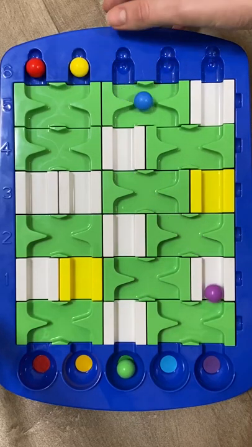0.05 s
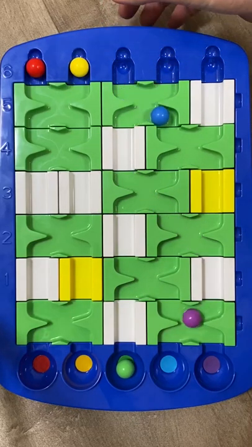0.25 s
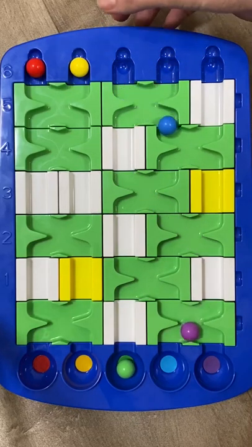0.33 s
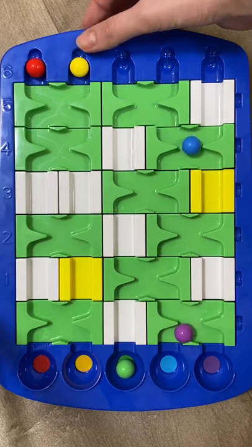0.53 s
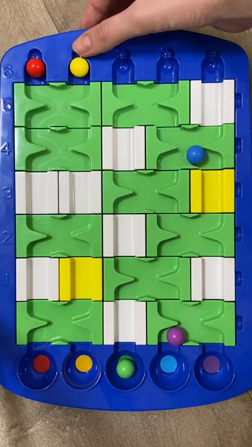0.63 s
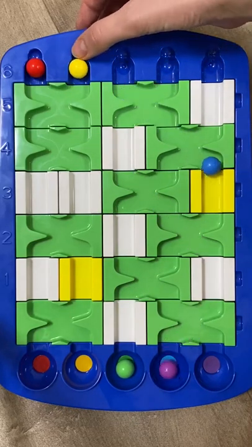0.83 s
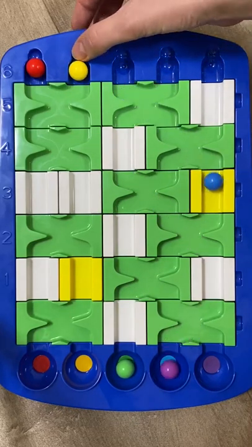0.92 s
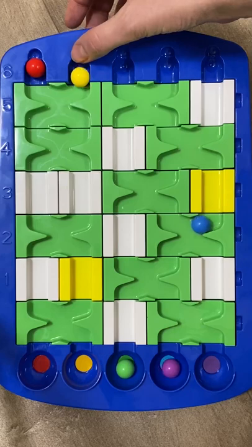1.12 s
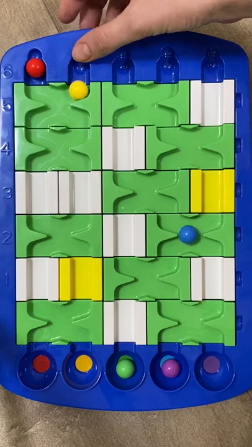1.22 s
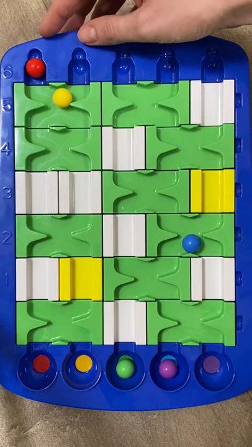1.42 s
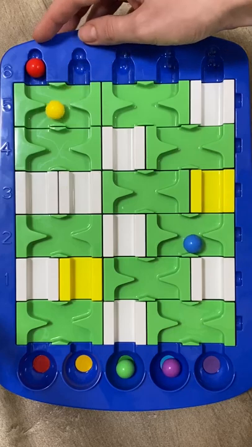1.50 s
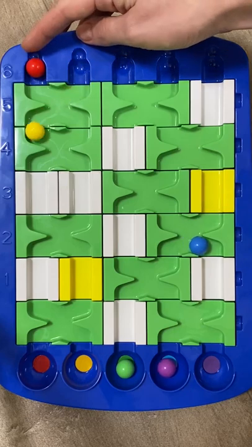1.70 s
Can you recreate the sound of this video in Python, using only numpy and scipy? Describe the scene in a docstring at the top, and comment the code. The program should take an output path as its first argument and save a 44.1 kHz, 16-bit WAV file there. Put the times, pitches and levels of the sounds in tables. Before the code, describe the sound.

Marbles knock irregularly along a plastic board, rolling faintly, and one bounces into a cup.

```python
"""In a fairly live room with a low hum, marbles roll down a tilted plastic board and knock against the
walls of its track tiles; one drops into a cup and rattles to rest. Each impact excites a dense set of
quickly damped modes, coloured by the resonances of tile or cup. Between impacts, tiny bumps under the
marbles drive the tiles faintly. Two closely spaced microphones receive the direct and reflected sound."""
import sys
import numpy as np
from scipy import signal
from scipy.fft import rfft, irfft, next_fast_len
from scipy.io import wavfile
from scipy.ndimage import uniform_filter1d

SR = 44100
rng = np.random.default_rng(int(sys.argv[2]) if len(sys.argv) > 2 else 0)


def int16_out(signal):
    """Quantize to a 16-bit WAV file."""
    q = np.round(np.clip(np.atleast_2d(signal).T, -1, 1) * 32767)
    wavfile.write(sys.argv[1], SR, q.astype(np.int16))


N = 77175
LEAD = SR // 5  # samples ahead of t = 0, so that the room is already sounding
SIZE = next_fast_len(N + LEAD + SR)
FREQS = np.maximum(np.arange(SIZE // 2 + 1) * SR / SIZE, 1)
# resonances of the track tiles: f/Hz, bandwidth/Hz, lift/dB
TILE_MODES = [(370.8, 18.7, 9), (497, 13, 5.5), (1094, 300, 3.5), (1803, 46, 3), (2176, 164, 7),
              (3177, 150, 5.5), (3866, 84, 11), (4310, 44, 4), (4730, 55, 4.5), (5960, 68, 1),
              (8280, 180, 8.5), (10160, 80, 4.5), (11480, 190, 7), (14200, 250, 0)]


def track_knocks():
    """Impact excitation: a marble strikes a track wall and the tile vibrates freely."""
    # knocks: t/s, rise/s, thud, clack, snap and tick level/dB, the wall's note f/Hz, note level/dB
    knocks = [(-0.03, 0.00077, -33.5, -32.5, -33, -34, 430, -39.5),
              (0.0885, 0.0018, -51, -65, -73, -62, 1680.0, -59),
              (0.1192, 0.0014, -40, -36, -37.5, -35, 1052, -44),
              (0.138, 0.0016, -48, -43, -48.5, -50, 1070, -48),
              (0.1542, 0.0021, -34.5, -39, -30, -24, 2046, -41),
              (0.1692, 0.0011, -45.5, -32, -43, -31.5, 1210, -41),
              (0.1775, 0.0014, -59, -51, -59, -49, 1860, -43),
              (0.193, 0.0036, -49, -38.5, -50.0, -44, 471, -37),
              (0.1985, 0.0016, -43, -50, -52.0, -42, 529, -39.5),
              (0.22, 0.0029, -56, -47, -52, -52, 346, -49.5),
              (0.3325, 0.001, -39.5, -32.5, -34.5, -32, 1177, -38.5),
              (0.3795, 0.0025, -74, -55, -61, -58, 2170.0, -55),
              (0.3897, 0.00088, -38, -39, -39, -28, 2120, -48.5),
              (0.441, 0.0017, -41, -34.5, -39.5, -32, 2040, -47.5),
              (0.4765, 0.00081, -48, -44, -49.0, -39, 1250, -52),
              (0.5695, 0.0011, -47.0, -50.5, -67, -68, 720, -45),
              (0.5992, 0.00052, -41, -47, -39.5, -43, 2170, -43),
              (0.606, 0.00046, -52, -36, -76, -60.0, 1116, -45),
              (0.6405, 0.00087, -47, -30, -47, -26.5, 1113, -42.5),
              (0.6485, 0.00036, -55, -48, -52, -62, 398, -43),
              (0.7255, 0.00083, -55, -49, -49.5, -56, 1080.0, -46),
              (0.7645, 0.00074, -48, -37.5, -34, -33.0, 1925, -45.5),
              (0.7825, 0.0013, -46, -44, -45, -68, 1820, -46.5),
              (0.7975, 0.0025, -61, -40.5, -46.5, -54, 1630.0, -46.0),
              (1.0688, 0.0014, -40.5, -34, -42.5, -40, 1160, -38.5),
              (1.086, 0.001, -37.5, -54, -52, -58, 2230, -42),
              (1.1037, 0.0018, -41, -26.5, -34, -23, 2100, -33),
              (1.2085, 0.0012, -75, -76, -54, -60, 2080, -58),
              (1.2542, 0.0019, -44.5, -32, -37, -29.5, 1200, -39.5),
              (1.2582, 0.00082, -38.5, -32.0, -34, -31, 1170, -35.5),
              (1.2655, 0.0026, -46, -42, -47, -57, 1297, -41.5),
              (1.3285, 0.00033, -52, -35.0, -49.5, -26.0, 1076, -36),
              (1.3905, 0.0042, -53, -47, -55.5, -58, 1214, -46),
              (1.4095, 0.00059, -47, -64, -68, -72, 1280, -52.5),
              (1.538, 0.00064, -56, -51.0, -85, -72.0, 1310, -51.5),
              (1.5758, 0.00097, -45, -37.5, -55.5, -29, 1365, -44.5),
              (1.595, 0.003, -51.5, -50, -49, -46.5, 526, -43.5),
              (1.6102, 0.00076, -52, -50, -44.5, -49, 1320, -50.0),
              (1.6885, 0.0013, -59.5, -64, -79, -61, 1290.0, -56.5),
              (1.7232, 0.0017, -43.5, -40, -41.5, -30.5, 1086, -51),
              (1.7375, 0.0012, -45, -41, -63, -55, 1380.0, -61)]
    # spectral envelope of a tile: f/Hz, level/dB
    colour = [(200, -36.5), (330, -7.5), (480, -8.5), (700, -9.5), (900, -7), (1150, -6.5), (2000, -7.5),
              (2800, -9.5), (4600, -8.5), (7000, -3), (8500, -8.5), (10500, -16.5), (15000, -19.5)]
    # decay time of a tile: f/Hz, T60/s
    ring = [(350, 0.07), (1200, 0.074), (3500, 0.072), (8000, 0.026), (15000, 0.014)]
    return impacts(knocks, colour, ring, TILE_MODES)


def cup_bounces():
    """Inelastic rebound: a marble lands in the cup and excites its modes anew at each bounce."""
    # bounces: t/s, rise/s, thud, clack, snap and tick level/dB, the spot's note f/Hz, note level/dB
    bounces = [(0.865, 0.001, -57, -39.5, -57, -77, 870, -55),
               (0.8769, 0.0012, -37.5, -24, -29.5, -33, 830, -32),
               (0.8913, 0.00017, -35.5, -33, -28.5, -33.5, 1890, -28.5),
               (0.9118, 0.0005, -59, -38, -40, -64, 2000, -54),
               (0.9158, 0.00087, -51, -45.0, -47, -55, 1970, -46),
               (0.921, 0.00032, -52, -43, -30, -40, 1990, -41),
               (0.9255, 0.00021, -56, -45.5, -35, -39.5, 704, -46),
               (0.9408, 0.00041, -62, -34, -44, -52, 2240, -38),
               (0.9742, 0.00023, -45, -32.5, -36, -42.5, 1880, -32.5),
               (0.989, 0.00026, -55.5, -35.0, -44.5, -52, 834, -39.5)]
    # spectral envelope of the cup: f/Hz, level/dB
    colour = [(200, -42), (340, -8.5), (480, -4.5), (650, -10), (900, -0.5), (1300, -10), (2000, -4),
              (3500, -3), (5000, -6), (8000, -4.5), (11000, -4.5), (15000, -1)]
    # decay time of the cup: f/Hz, T60/s
    ring = [(350, 0.14), (1200, 0.099), (3500, 0.036), (8000, 0.056), (15000, 0.009)]
    # resonances of the cup: f/Hz, bandwidth/Hz, lift/dB
    modes = [(369.5, 42, 11.2), (539, 72, 8.8), (779, 63, 6.9), (994, 73, 5.8), (1505, 36, 10.7),
             (1874, 69, 6.2), (3130, 20, 4.5), (3430, 40, 8.6), (3620, 42, 7), (5840, 73, 2.3),
             (12600, 210, 4.3), (14400, 290, 5.2)]
    return impacts(bounces, colour, ring, modes)


def impacts(rows, colour, ring, modes):
    """Damped free vibration: each blow gives a crack, a ring of dense modes and the struck spot's note."""
    # centres of thud, clack, snap and tick: f/Hz
    registers = [450, 1400, 4200, 7500]
    crack_db, crack_s, crack_cycles = 3, .0007, 1.2  # height over the ring; time constant in two parts
    note_t60_cycles = 18.6
    rows = np.array(rows)
    start_s, rise_s, register_db = rows[:, 0], rows[:, 1:2], rows[:, 2:6]
    note_hz, note_db = rows[:, 6:7], rows[:, 7:8]
    t = np.arange(int(.1 * SR)) / SR
    attack = 1 - np.exp(-(t / np.maximum(rise_s, 1 / SR)) ** 2)
    note = np.sin(2 * np.pi * note_hz * t) * from_db(-60 * t * note_hz / note_t60_cycles)
    sounds = equal_energy(attack * note) * from_db(note_db)
    for hz, noise in noise_bands((len(rows), len(t))):
        crack = from_db(crack_db) * np.exp(-np.maximum(t - rise_s, 0) / (crack_s + crack_cycles / hz))
        decay = from_db(-60 * t / at_hz(ring, hz))
        burst = equal_energy(noise * attack * (crack + decay))
        band_db = np.array([np.interp(np.log(hz), np.log(registers), db) for db in register_db])
        sounds = sounds + burst * from_db(band_db + at_hz(colour, hz))[:, None]
    train = np.zeros(SIZE)
    for s, sound in zip(start_s, sounds):
        start = LEAD + int(s * SR)
        train[start:start + len(t)] += sound
    return resonate(train[:LEAD + N], modes)


def rolling():
    """Roughness excitation: tiny bumps under the marbles drive the tiles with random impulses."""
    # strength of the rolling: t/s, level/dB
    strength = [(0, -67), (.1, -51.5), (.2, -54.5), (.3, -58), (.45, -61), (.55, -59.5), (.7, -63),
                (.84, -51.5), (.93, -41.5), (1.02, -47), (1.15, -51.5), (1.3, -53), (1.48, -62.5),
                (1.62, -59.5), (1.75, -61)]
    # spectral envelope of a bump: f/Hz, level/dB
    colour = [(100, -55), (220, 2), (370, -0.5), (700, 8.5), (1200, -0.5), (2200, -1), (3200, -10.5),
              (6000, -49), (10000, -21.5), (16000, -36)]
    bumps_per_s, spread_db = 760, 0.5
    n = LEAD + N
    sizes = from_db(spread_db * np.minimum(rng.exponential(1, n), 4)) * rng.choice([-1, 1], n)
    bumps = sizes * (rng.random(n) < bumps_per_s / SR)
    patter = resonate(filtered(bumps, from_db(at_hz(colour, FREQS))), TILE_MODES)
    t = (np.arange(n) - LEAD) / SR
    return rms_one(patter) * from_db(np.interp(t, *np.transpose(strength)))


def reflections(x):
    """Scattering and reverberation: quick echoes off the board, and a tail that dies sooner in the treble."""
    # gain of the diffuse field: f/Hz, level/dB
    room_level = [(150, -4), (400, -10.5), (1000, -12.5), (2200, -8.5), (4500, -10), (8500, -14.5),
                  (15000, -13)]
    # reverberation time: f/Hz, T60/s
    room_t60 = [(200, 1), (1000, 0.46), (2500, 0.44), (5000, 0.44), (9000, 0.3), (15000, 0.19)]
    # share of the board's scattering that differs between the microphones: f/Hz, level/dB
    scatter_level = [(200, -32), (600, -7), (1300, -17.5), (3000, -19), (8000, -33), (15000, -5)]
    delay_s, build_s, width = 0.0043, 0.0029, 0.3
    scatter_delay_s, scatter_t60_s = 0.0016, 0.017
    t = np.arange(SR) / SR
    build = 1 - np.exp(-np.maximum(t - delay_s, 0) / build_s)
    tail = sum(noise * build * from_db(-60 * t / at_hz(room_t60, hz))
               for hz, noise in noise_bands((2, SR)))
    mid, side = filtered(x, whitened_spectrum(tail) * from_db(at_hz(room_level, FREQS)))
    scatter = rng.standard_normal(SR) * from_db(-60 * t / scatter_t60_s) * (t > scatter_delay_s)
    scatter /= np.sqrt(np.sum(scatter ** 2))
    scattered = filtered(x, rfft(scatter, SIZE) * from_db(at_hz(scatter_level, FREQS)))
    return mid + (width * side + scattered) * np.array([[1], [-1]])


def background():
    """Stationary noise floor: soft low room noise and a sinusoidal mains hum."""
    # spectral density of the room noise: f/Hz, relative level/dB
    colour = [(20, -31), (30, -26), (40, -22), (58, 4.5), (80, -5), (140, 4.5), (220, -11), (500, -9),
              (1500, -28), (5000, -49), (16000, -36)]
    floor_db, width = -60.5, 0.13
    hum_hz, hum_db = 100.6, -60
    mid, side = rms_one(filtered(rng.standard_normal((2, N)), from_db(at_hz(colour, FREQS))))
    hum = np.sqrt(2) * np.sin(2 * np.pi * hum_hz * np.arange(N) / SR)
    return from_db(floor_db) * (mid + width * side * np.array([[1], [-1]])) + from_db(hum_db) * hum


def resonate(x, modes):
    """Resonance: each mode lifts its own narrow band and rings on."""
    for hz, width_hz, lift_db in modes:
        b, a = signal.iirpeak(hz, hz / width_hz, fs=SR)
        x = x + (from_db(lift_db) - 1) * signal.lfilter(b, a, x)
    return x


def noise_bands(shape):
    """Third-octave bands of noise, each with its centre frequency; neighbours are uncorrelated."""
    edges_hz = 180 * 2 ** (np.arange(21) / 3.04)
    run_in = SR // 20
    white = rng.standard_normal((shape[0], 2, shape[1] + run_in))
    for k, (low, high) in enumerate(zip(edges_hz, edges_hz[1:])):
        sos = signal.butter(2, [low, high], "band", fs=SR, output="sos")
        yield np.sqrt(low * high), signal.sosfilt(sos, white[:, k % 2])[:, run_in:]


def whitened_spectrum(x, width_hz=40):
    """Whitening: division by the smoothed magnitude leaves only the fine structure of a spectrum."""
    spectrum = rfft(x, SIZE)
    power = uniform_filter1d(np.abs(spectrum) ** 2, size=int(width_hz * SIZE / SR))
    return spectrum / np.sqrt(power + 1e-4 * power.mean(axis=-1, keepdims=True))


def equal_energy(bursts, window_s=.007):
    """Energy normalisation: each burst carries as much as rms 1 held for window_s."""
    return bursts / np.sqrt(np.sum(bursts ** 2, axis=1, keepdims=True) / (window_s * SR) + 1e-20)


def rms_one(x):
    """Power normalisation to rms 1."""
    return x / np.sqrt(np.mean(x ** 2) + 1e-20)


def from_db(db):
    """Amplitude ratio of a level in decibels."""
    return 10 ** (np.asarray(db) / 20)


def at_hz(points, hz):
    """Interpolation of a table on a log-frequency axis."""
    f, value = np.transpose(points)
    return np.interp(np.log(hz), np.log(f), value)


def filtered(x, response):
    """Convolution, as the product of spectrum and frequency response."""
    return irfft(rfft(x, SIZE) * response, SIZE)[..., :x.shape[-1]]


def scene():
    """Superposition of knocks, bounces and rolling, their reflections and the noise floor."""
    direct = track_knocks() + cup_bounces() + rolling()
    return (direct + reflections(direct))[:, LEAD:] + background()


def record(dry):
    """Spaced-pair stereophony: the microphones differ in phase and level; a low-pass cuts the top."""
    # lead of left over right: f/Hz, phase/rad
    phase = [(30, 0), (800, .08), (1750, -.08), (2500, .6), (3300, .25), (4400, .8), (5000, .35),
             (6000, 1.4), (7350, 3.14), (9470, 5.6), (10900, 6.5), (13400, 9.4), (15800, 11.6)]
    # left minus right: f/Hz, level/dB
    balance = [(60, 0.5), (180, -2.2), (380, -2), (600, -3.1), (900, -1.5), (1400, 0.3), (8000, 0)]
    cutoff_hz = 16000
    half = np.array([[.5], [-.5]])
    pair = from_db(half * at_hz(balance, FREQS)) * np.exp(1j * half * at_hz(phase, FREQS))
    low_pass = signal.ellip(10, .3, 80, cutoff_hz, fs=SR, output="sos")
    return signal.sosfilt(low_pass, filtered(dry, pair))


dry = scene()
out = record(dry)
int16_out(out)
```